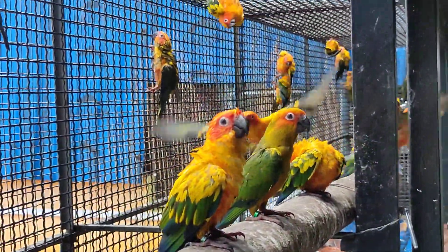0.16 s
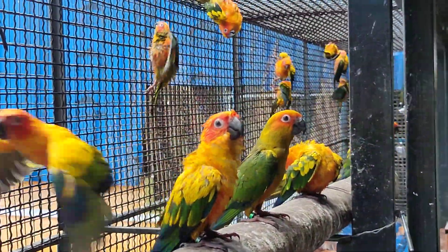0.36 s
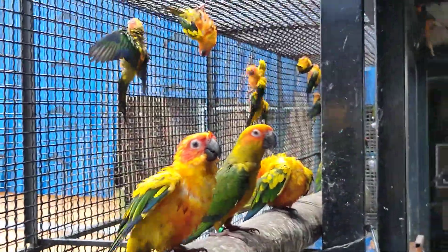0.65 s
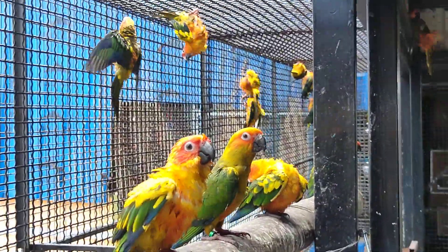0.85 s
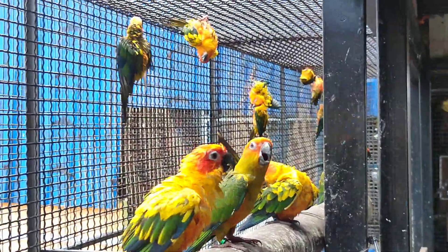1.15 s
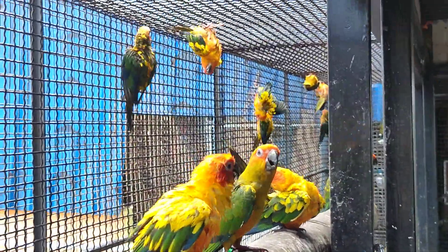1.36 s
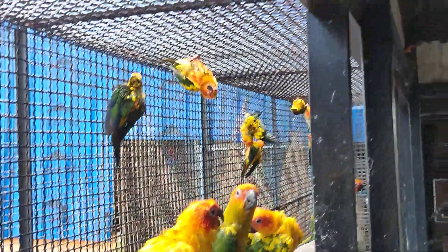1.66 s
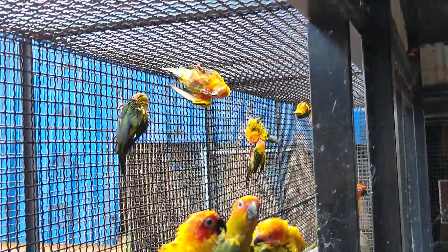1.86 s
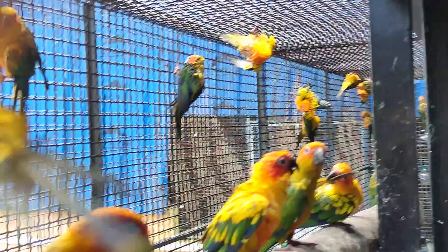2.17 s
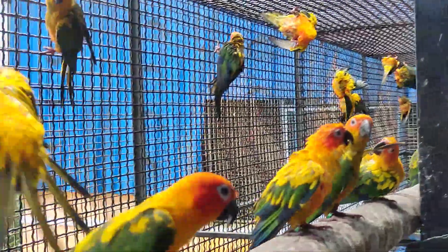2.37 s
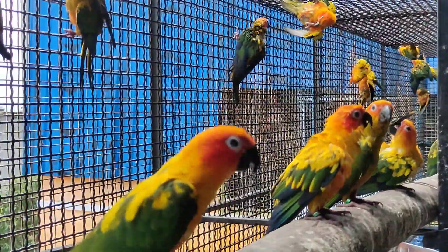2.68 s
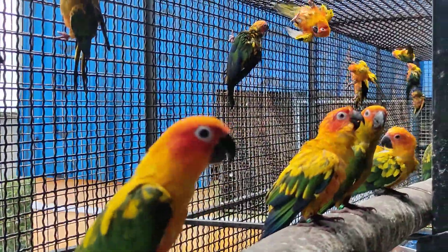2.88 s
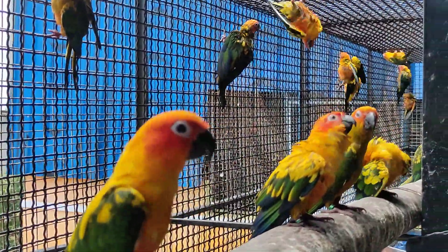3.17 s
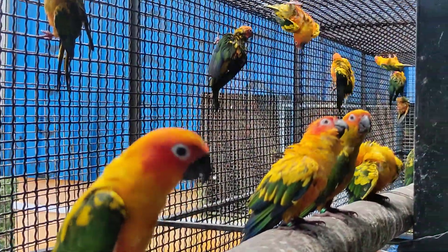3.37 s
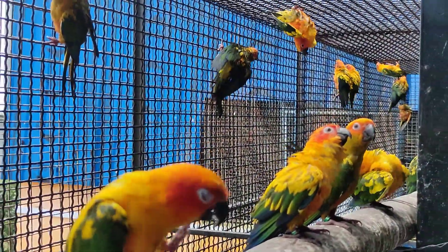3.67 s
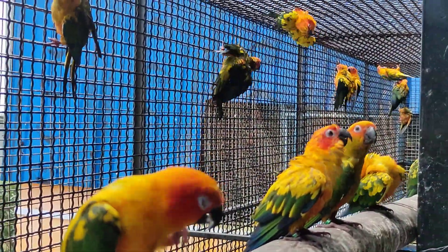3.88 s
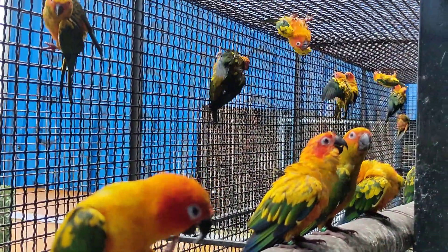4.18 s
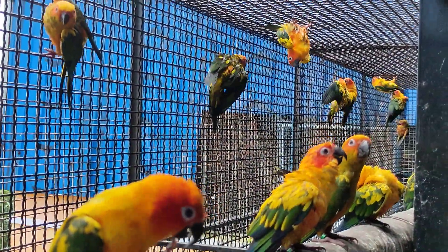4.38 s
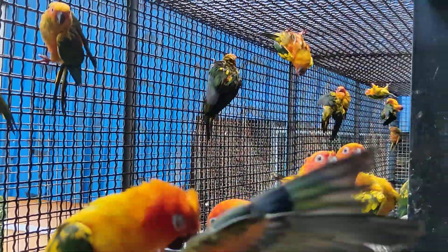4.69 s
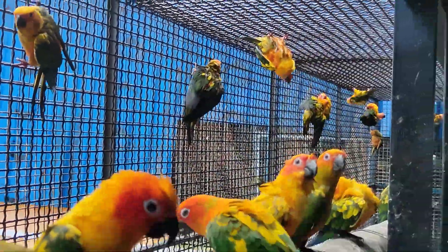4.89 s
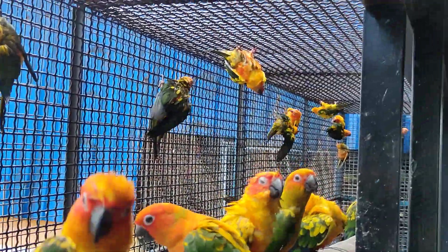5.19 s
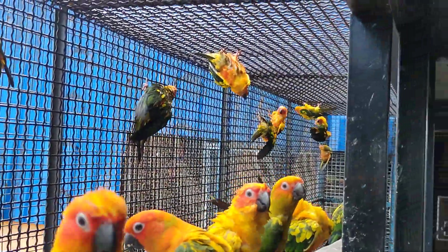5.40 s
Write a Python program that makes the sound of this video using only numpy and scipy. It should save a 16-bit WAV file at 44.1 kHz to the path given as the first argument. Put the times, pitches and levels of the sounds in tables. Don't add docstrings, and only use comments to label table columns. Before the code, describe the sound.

A flock of parrots squawks shrilly and raspily in an outdoor wire aviary, with a brief flurry of dull knocks against the microphone.

```python
import sys
import numpy as np
from scipy import signal
from scipy.fft import rfft, irfft, next_fast_len
from scipy.io import wavfile
from scipy.ndimage import uniform_filter1d, map_coordinates

SR = 44100
rng = np.random.default_rng(int(sys.argv[2]) if len(sys.argv) > 2 else 0)


def linear_from_db(decibels):
    return 10 ** (np.asarray(decibels, float) / 20)


def materialize(psi):
    bounded = np.clip(np.atleast_2d(psi).T, -1, 1)
    quanta = np.round(bounded * 32767).astype(np.int16)
    wavfile.write(sys.argv[1], SR, quanta)


N = 244314


def unit(x):
    return x / np.sqrt(np.mean(x ** 2) + 1e-20)


def along(points, hz):
    f, v = np.transpose(points)
    return np.interp(np.log(hz + 1), np.log(f + 1), v)


def over_time(points):
    return np.interp(np.arange(N) / SR, *np.transpose(points))


def wobble(rate, size):
    knots = rng.standard_normal(int(size * rate / SR) + 4)
    return map_coordinates(knots, [np.arange(size) * rate / SR])


def filtered(x, response):
    m = next_fast_len(N + 8192)
    spectrum = rfft(x, m) * response(np.fft.rfftfreq(m, 1 / SR))
    return irfft(spectrum, m)[..., :N]


# (frequency [Hz], density [dB])
HUM_SPECTRUM = [(15, -60), (25, -19), (60, -34), (86, -14), (262, -4), (340, -7.5), (490, -5.5),
                (535, -6.5), (1070, -15), (1600, -15.5), (2080, -38), (3520, -120)]
# (frequency [Hz], likeness [0-1])
HUM_LIKENESS = [(60, 0.99), (300, 0.875), (700, 0.133), (1400, 0.0167)]
# (time [s], level [dB])
HUM_SWELL = [(0, -40), (.79, -38), (1.31, -43), (1.87, -39.5), (2.68, -37.5), (2.82, -48), (2.97, -39.5),
             (4.5, -38.5), (5.54, -39.5)]


def outdoor_hum():
    def mid_side(hz):
        angle = np.arccos(np.clip(along(HUM_LIKENESS, hz), -1, 1)) / 2
        return linear_from_db(along(HUM_SPECTRUM, hz)) * [np.cos(angle), np.sin(angle)]

    mid, side = filtered(rng.standard_normal((2, N)), mid_side)
    level_db = over_time(HUM_SWELL) + 3 + 1.53 * wobble(12, N) + 1.2 * wobble(40, N)
    return unit(np.array([mid + side, mid - side])) * linear_from_db(level_db)


# (centre [Hz], width [Hz], level [dB])
CHORUS_BANDS = [(2000, 556, 5.5), (3100, 890, 4), (4244, 555, 6), (5930, 840, 0.5), (8640, 4100, -1),
                (10360, 4500, -7.5), (15000, 8600, 2)]
# (time [s], level [dB])
CHORUS_UPROAR = [(0, -28.5), (.23, -35), (.6, -30.5), (.8, -27.5), (.97, -34), (1.6, -27.5), (1.9, -33),
                 (2.05, -42), (2.3, -33), (2.43, -34.5), (2.65, -27.5), (2.85, -37), (3.3, -31),
                 (3.55, -34), (4.3, -28), (4.55, -30), (5.17, -34), (5.54, -31)]


def distant_chorus():
    def bands(hz):
        return np.sqrt(sum(linear_from_db(2 * db) / (1 + (2 * (hz - centre) / width) ** 4)
                           for centre, width, db in CHORUS_BANDS))

    chorus = unit(filtered(rng.standard_normal((2, N)), bands))
    return chorus * linear_from_db(over_time(CHORUS_UPROAR) + 1.5 * wobble(8.2, N) + 1.69 * wobble(70, N))


def phrase(t, call, phrasing):
    _, length, level_db, hz, swell_db = call
    attack, release, scoop, sag, drop = phrasing
    attack, release = min(attack, .4 * length), min(release, .55 * length)
    shape_db = np.interp(t, [0, attack, length - release, length], [-12, 0, swell_db, swell_db - 19])
    scoop_s, drop_s = .035, .026
    climb = scoop * np.clip(1 - t / scoop_s, 0, 1) ** 3
    slide = drop * np.clip(1 - (length - t) / drop_s, 0, 1) ** 2
    return level_db + shape_db, (hz - sag * t) * (1 - climb - slide)


def squawk(call, phrasing, trill_hz, hoarse, throat):
    size = round(call[1] * SR)
    t = np.arange(size) / SR
    level_db, pitch_hz = phrase(t, call, phrasing)
    beat = np.cumsum(trill_hz * (1 + .08 * hoarse * wobble(48.3, size))) / SR % 1
    swing = .018 * np.clip(trill_hz - 59, 6, 12)
    calm = np.clip((t[-1] - t) / 0.05, .3, 1)
    sweep = 1 + swing * calm * (np.sqrt(beat) - 2 / 3) + hoarse * .06 * wobble(450, size)
    phase = 2 * np.pi * np.cumsum(pitch_hz * sweep) / SR
    opening = np.minimum(beat / .15, 1) * (1 - beat) ** .9
    pulse = 1 - .85 * calm * (1 - opening)
    order = np.arange(1, 10)[:, None]
    shake = .035 * order ** 1.6 + hoarse * (.85 + .08 * order)
    rasp = shake * np.array([wobble(600, size) for _ in order])
    tones = linear_from_db(throat[3] * order) * np.cos(order * phase + rasp + rng.normal(0, .9, order.shape))
    tones[:3] *= linear_from_db(throat[:3])[:, None]
    tones[0] /= pulse ** 0.25
    tones[1:] *= 1 + (0.15 + 0.72 * hoarse) * np.cos(phase / 2)
    voice = pulse * tones.sum(0) * linear_from_db(1.9 * hoarse * wobble(301, size))
    edge = np.minimum(1, np.minimum(t, t[-1] - t) / 0.00062)
    return unit(voice) * linear_from_db(level_db) * edge


def echoes(x, t60, build):
    t = np.arange(SR // 2) / SR
    tail = rng.standard_normal((2, len(t))) * linear_from_db(-60 * t / t60) * (1 - np.exp(-t / build))
    return signal.fftconvolve(x[None], tail / np.linalg.norm(tail[0]), axes=1)


BIRD_SEATS = {"front": (65.3, .15, .13, 1.5, .98), "front right": (66.35, .13, .13, -3, -.1),
              "left": (73.2, .17, .35, 4, .07), "perch": (64, .28, .65, 0, .1),
              "shrill": (65, .1, .55, -4, .2), "chirper": (91.7, .1, .12, 7.5, -.47),
              "chatterer": (64.5, .12, .12, -2.1, -.23), "small": (73, .22, .36, 6, -.47),
              "slider": (66, .23, .7, -1, -.2), "rasper": (66, .43, .85, -.6, .4),
              "screamer": (62, .24, .8, 1.1, .27), "dull": (69, .36, .8, -7, -.45),
              "thin": (66, .75, .6, -3, 0), "sweller": (68.5, .23, .6, .6, .36),
              "pulser": (72.5, .18, .5, 0, .2), "low": (65, .52, .75, 2.1, -.3),
              "holder": (66, .34, .88, -.6, .25), "hoarse": (66, .66, .9, -1.1, .3),
              "trailer": (66, .38, .85, -2.5, .1)}
BIRD_THROATS = {"front": (2.5, 6, 9, 2.3), "front right": (.6, 7.5, 11, .6), "left": (-1.5, 2.1, 0, 0),
                "perch": (4, 4.5, 5, 1.5), "shrill": (-5, .6, 6.5, 1.9), "chirper": (14, 14, 3, .3),
                "chatterer": (0, .6, 3, .6), "small": (8, 4.5, -6, 1.3), "slider": (5.5, 2.1, 3, 1.1),
                "rasper": (-.6, -1.1, .6, .9), "screamer": (3, 7.5, 5.5, .9), "dull": (-6, 1.1, -3, 0),
                "thin": (0, -9.5, 15, 3.5), "sweller": (.6, 1.5, 0, .8), "pulser": (3.5, 7, 5.5, 1.3),
                "low": (-9, -3, 4, .3), "holder": (1.5, 1.1, 1.5, 1.1), "hoarse": (0, 1.5, 3, .6),
                "trailer": (-3, 3, 1.5, .2)}
BIRD_PHRASING = {"front": (.003, .009, .18, 480, .19), "front right": (.004, .016, .18, 500, .17),
                 "left": (.013, .009, .35, 100, .11), "perch": (.014, .02, .04, 800, .08),
                 "shrill": (.022, .025, .05, 900, .08), "chirper": (.005, .012, 0, 3000, .02),
                 "chatterer": (.002, .005, .08, 0, .03), "small": (.008, .009, .04, 0, .1),
                 "slider": (.035, .025, .02, 900, .06), "rasper": (.065, .09, .04, 0, 0),
                 "screamer": (.03, .015, 0, 600, 0), "dull": (.035, .07, .02, 0, 0),
                 "thin": (.02, .004, .03, 0, 0), "sweller": (.025, .12, 0, 250, 0),
                 "pulser": (.035, .12, 0, 350, 0), "low": (.03, .03, 0, -400, .02),
                 "holder": (.015, .015, .02, 350, 0), "hoarse": (.04, .06, 0, 100, 0),
                 "trailer": (.004, .09, 0, 120, 0)}
PERCH_CALLS = { "front": [(1.076, .2, -15.5, 2035, 1.3)], "front right": [(1.424, .166, -18, 2000, 4)],
               "small": [(.44, .035, -24.5, 1990, 0), (.478, .069, -23.5, 2040, 1)],
               "left": [(2.732, .113, -17, 2170, -1.5)], "slider": [(.625, .14, -21, 2110, 1.1),
               (5.452, .11, -27, 2030, 5)], "perch": [(4.395, .102, -13.5, 2050, -1.5)],
               "shrill": [(3.004, .14, -25.5, 2150, 3)], "chirper": [(.148, .009, -17, 2590, 0),
               (.159, .044, -18, 1690, -4), (.205, .017, -16, 1400, -4)],
               "chatterer": [(5.3205, .005, -25, 1400, -3), (5.3365, .01, -27, 1400, -5),
               (5.353, .013, -26, 1420, -2), (5.369, .015, -24, 1420, -2), (5.385, .023, -23, 1390, -3)],
               "thin": [(1.03, .042, -29, 1800, -1)]}
MORE_CALLS = { "sweller": [(2.096, .24, -18.5, 2040, 1.1)], "pulser": [(2.458, .25, -18, 2145, .6)],
              "low": [(3.24, .16, -34, 1610, 4), (5.23, .085, -34, 1700, -1.1)],
              "rasper": [(3.55, .17, -23, 2090, 0), (3.78, .28, -17.5, 2115, -.6),
              (4.855, .13, -26, 2066, 2.1)], "screamer": [(4.07, .2, -17, 2060, -4)],
              "dull": [(5.03, .17, -29, 2100, -8)], "holder": [(2.665, .075, -22, 2190, 0),
              (3.15, .13, -31, 2045, 0), (4.255, .155, -18, 2000, -2.5)],
              "hoarse": [(.05, .11, -30, 2100, 3), (.25, .17, -26.5, 1555, 2.1),
              (4.66, .14, -23.5, 1780, -3)], "trailer": [(.765, .22, -26, 1950, -12),
              (1.28, .15, -23.5, 2070, -5), (1.6, .3, -24.5, 2000, 0), (2.85, .16, -29, 2055, -3),
              (3.395, .14, -31, 2120, -2.1), (4.51, .17, -38, 1660, 0)]}


def flock():
    out, roof = np.zeros((2, N + SR)), np.zeros(N + SR)
    for bird, calls in {**PERCH_CALLS, **MORE_CALLS}.items():
        trill_hz, hoarse, far, left_db, lag_ms = BIRD_SEATS[bird]
        lag = round(lag_ms * SR / 1000)
        for call in calls:
            voice = squawk(call, BIRD_PHRASING[bird], trill_hz, hoarse, BIRD_THROATS[bird])
            at = round(call[0] * SR)
            heard = np.sqrt(far) * echoes(voice, t60=0.07, build=0.0015)
            direct = np.sqrt(1 - far) * voice
            heard[0, max(lag, 0):][:len(voice)] += direct
            heard[1, max(-lag, 0):][:len(voice)] += direct
            out[:, at:at + heard.shape[1]] += linear_from_db(3.0) * heard * linear_from_db([[left_db / 2], [-left_db / 2]])
            roof[at:at + len(voice)] += voice
    return out[:, :N] + linear_from_db(-11) * echoes(roof, t60=0.23, build=.01)[:, :N]


# (time [s], peak [dB], thud [Hz], t60 [s])
HAND_BUMPS = [(1.364, -5, 224, 0.038), (1.371, -7.5, 238.3, 0.0345), (1.387, -16, 230, 0.034),
              (1.397, -17, 225, 0.023), (1.406, -23, 237, 0.086), (1.42, -17, 228, 0.0253),
              (1.446, -11.5, 219, 0.0187), (1.459, -22, 242.2, 0.06), (1.466, -8, 248.4, 0.023),
              (1.572, -24, 232, 0.067), (1.583, -6, 239, 0.014), (1.592, -15.5, 228, 0.052),
              (1.601, -12.5, 217, 0.03), (1.623, -25.5, 230, 0.031), (2.164, -22, 222, 0.018)]


def bumps():
    out, t = np.zeros(N + SR), np.arange(SR // 8) / SR
    for s, db, hz, t60 in HAND_BUMPS:
        thud = np.sin(2 * np.pi * hz * t)
        thud += .5 * np.sin(2 * np.pi * 1.95 * hz * t) * linear_from_db(-60 * t / 0.028)
        puff = 2.14 * uniform_filter1d(rng.standard_normal(len(t)), size=24) * linear_from_db(-60 * t / 0.08)
        decay = linear_from_db(db + 9.5 - 60 * t / t60) * np.minimum(t / 0.00122, 1)
        out[round(s * SR):][:len(t)] += decay * (thud + puff)

    def soft(hz):
        return hz ** 2 / (hz ** 2 + 60 ** 2) / (1 + (hz / 1300) ** 4)

    return filtered(out[:N], soft) * linear_from_db([[0], [-24]])


# (time [s], peak [dB])
CLAW_TICKS = [
    (2.0846, -32),
    (4.6194, -24),
    (5.0267, -27),
]


def ticks():
    out, t = np.zeros((2, N + SR)), np.arange(SR // 20) / SR
    for s, db in CLAW_TICKS:
        flick = linear_from_db(db + 3 - 60 * t / 0.0088) * rng.standard_normal((2, len(t)))
        out[:, round(s * SR):][:, :len(t)] += flick
    return filtered(out[:, :N], lambda hz: hz ** 2 / (hz ** 2 + 1800 ** 2))


def scene():
    return outdoor_hum() + distant_chorus() + flock() + bumps() + ticks()


def roll_off(x):
    return signal.sosfilt(signal.butter(12, 16960, fs=SR, output="sos"), x)


# (frequency [Hz], gain [dB])
LEFT_PORT = [(700, -4), (2000, -1), (4100, 1), (6000, 0.5), (8000, 4.5), (9800, 4), (10800, -6.5),
             (12500, -21.5), (16000, -25)]
# (frequency [Hz], gain [dB])
RIGHT_PORT = [(700, -3), (2000, 2), (4100, 4), (6000, 8.5), (7200, 7.5), (8300, -11.5), (9500, -11.5),
              (12500, -28.5), (16000, -19)]


def record(dry):
    x = filtered(dry, lambda hz: linear_from_db([along(LEFT_PORT, hz), along(RIGHT_PORT, hz)]))
    x = x / (1 + np.abs(x / .72) ** 6) ** (1 / 6)
    mix = filtered(x, lambda hz: (hz < 15900) * hz ** 4 / (hz ** 4 + 28 ** 4))
    return roll_off(mix)


dry = scene()
out = record(dry)
materialize(out)
```